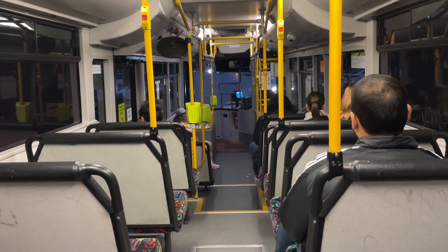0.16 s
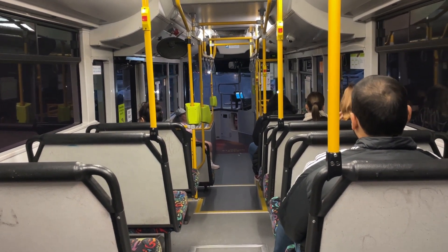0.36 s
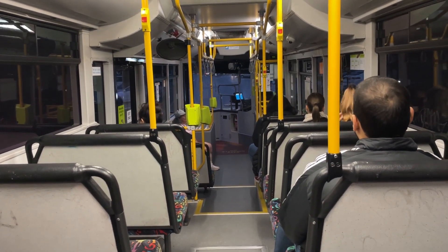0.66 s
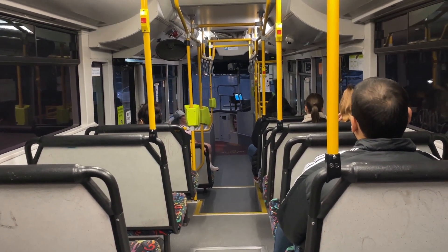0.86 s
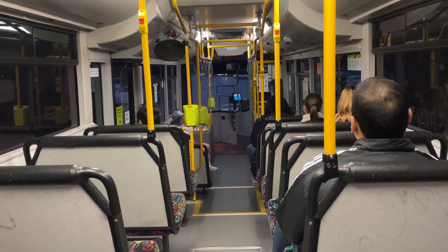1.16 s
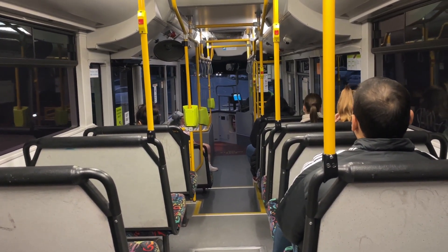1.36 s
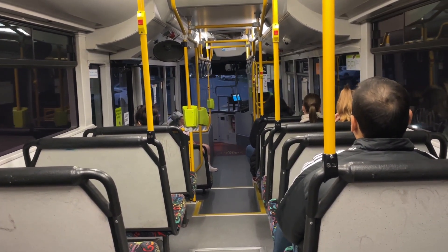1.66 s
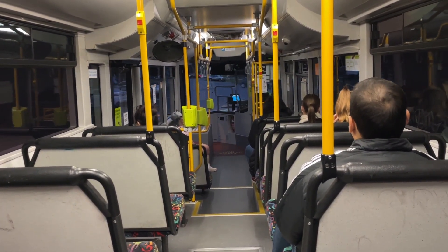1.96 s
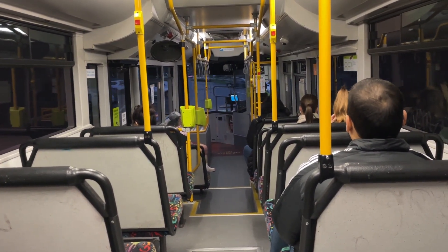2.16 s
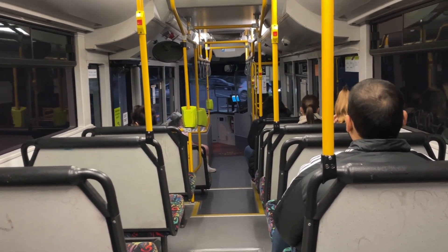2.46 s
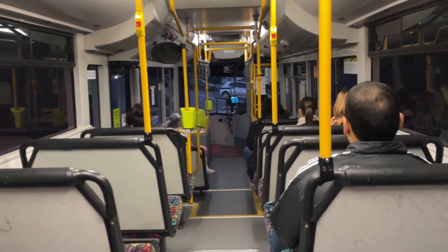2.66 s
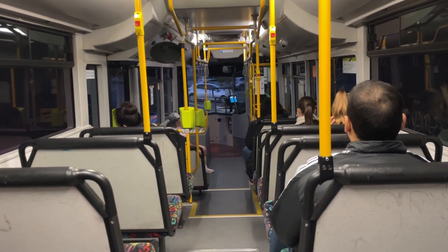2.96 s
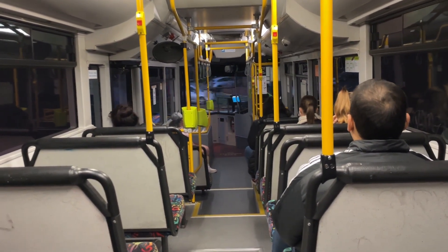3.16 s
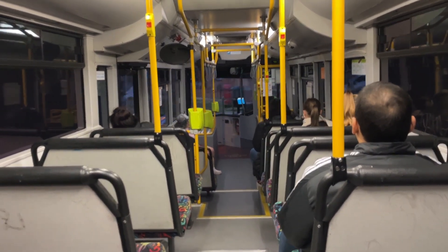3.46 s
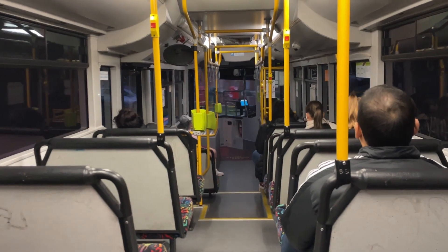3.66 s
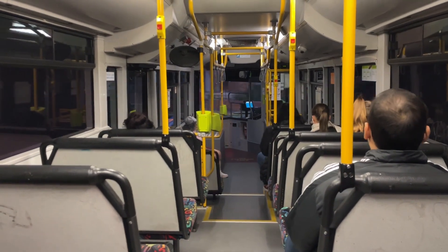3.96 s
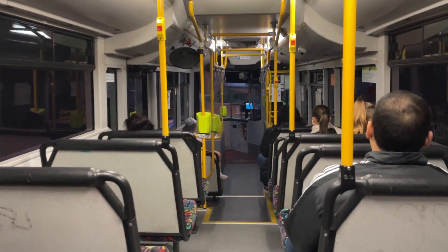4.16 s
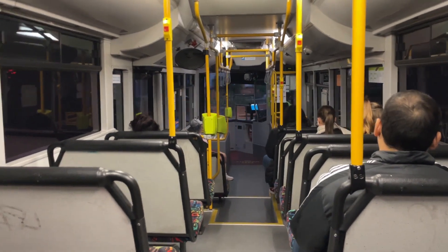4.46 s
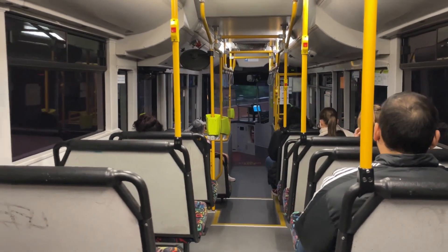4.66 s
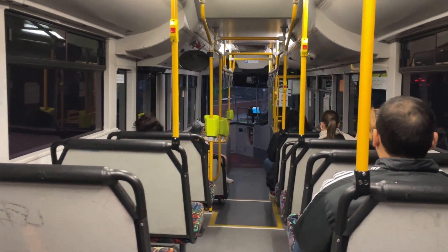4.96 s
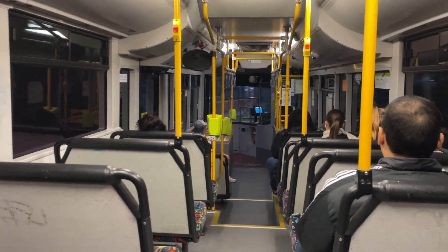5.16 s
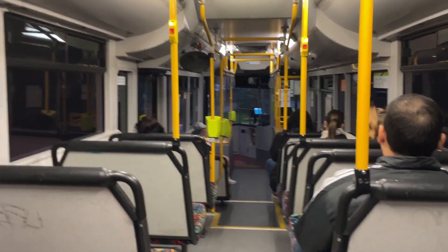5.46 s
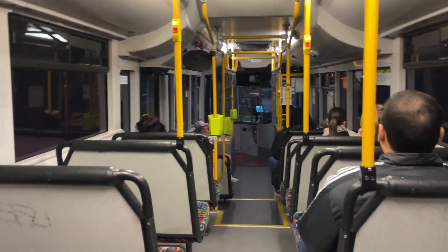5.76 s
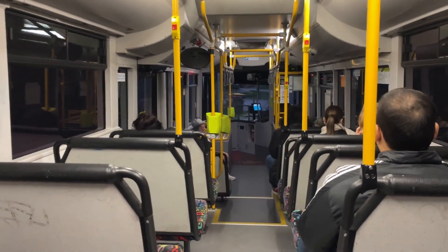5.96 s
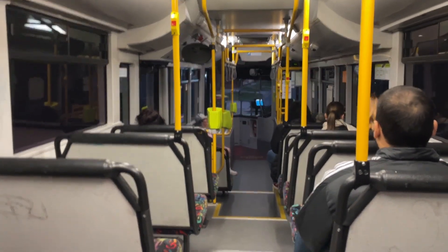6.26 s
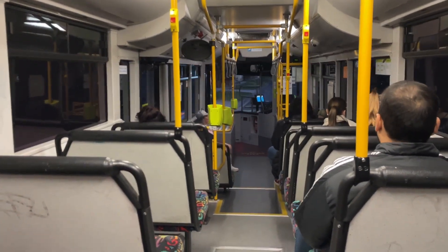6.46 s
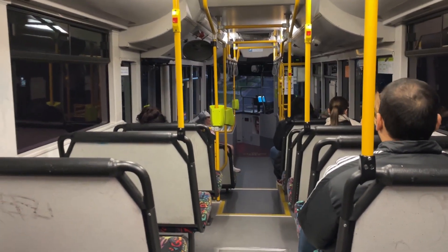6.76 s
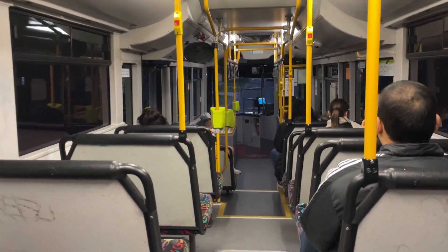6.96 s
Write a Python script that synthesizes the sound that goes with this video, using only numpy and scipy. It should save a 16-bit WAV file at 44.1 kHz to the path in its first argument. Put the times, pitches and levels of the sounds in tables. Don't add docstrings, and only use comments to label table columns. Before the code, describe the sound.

Inside an enclosed bus cabin, close stereo pickup. From 0 to 0.65 s a diesel idles with a very low, pulsing throb, around 30 beats a second, with tiny high air puffs and a barely audible brake squeal at the start. From 0.65 s it pulls away: the pitch doubles by about 1.7 s, then rises more slowly, nearly level around 3 s, as the low boom swells and shifts through cabin resonances. Gear whine, body rumble and soft combustion clatter thicken. Light jolts come near 1.05, 1.45, 2.2 and 2.6 s, with brief trim buzzes. From 4.5 s the revs climb again, peaking near 6.3 s; tyre and air hiss grows, and the hardest jolt lands at 5.2 s. At 5.85 s a loud, bright compressed-air release bursts and fades slowly. Loose trim rattles around 6.2 s, then engine pitch falls steeply and whine slackens until 7.1 s.

```python
import sys
import numpy as np
from scipy import signal
from scipy.fft import rfft, irfft
from scipy.io import wavfile
from scipy.ndimage import uniform_filter1d, minimum_filter1d, map_coordinates

SR = 44100
rng = np.random.default_rng(int(sys.argv[2]) if len(sys.argv) > 2 else 0)


def master(y):
    cut = np.clip(np.atleast_2d(y).T, -1, 1)
    pcm = np.round(cut * 32767)
    wavfile.write(sys.argv[1], SR, pcm.astype(np.int16))


def voltage_ratio(level):
    return 10 ** (np.asarray(level, float) / 20)


N = 313992
SECONDS = np.arange(N) / SR

# time_s, firing_hz
ENGINE_SPEED = [(0, 30.3), (.63, 30.4), (.875, 41.3), (1.05, 47.8), (1.25, 52.8), (1.625, 59.3),
                (2.2, 67.1), (2.8, 70.7), (3.3, 70.9), (4.5, 74.4), (4.65, 75.5), (5.125, 84), (5.75, 91.4),
                (6.05, 94.2), (6.29, 95), (6.4, 91.8), (6.75, 75), (7.12, 56)]
IDLE_HZ = 30
# mode_hz, width_hz, left_strength (signed), right_strength (signed)
CABIN_MODES = [(20.0, 2, 0.97, 0.731), (51, 26.6, -0.43, -0.37), (53.7, 23.1, 0.63, 0.59),
               (60.9, 2.4, -0.3, -0.36), (70.5, 11.6, 0.39, 0.18), (76.44, 6.14, -0.28, -0.41),
               (85.5, 23, 0.15, 0.26), (95.3, 3.7, -0.29, -0.19)]
# order (multiple of the firing rate), level_db
SHAFT_ORDERS = [(.77, -0.5), (1.53, -9), (2.001, -8.5), (3.07, -10)]
# mode_hz, width_hz, level_db
FRAME_MODES = [(48.1, 2.3, -14.5), (63.9, 8.9, -22), (91.6, 15, -15.5), (122.8, 14, -16),
               (176.3, 11, -15.5), (223.7, 16.9, -19.5), (253.2, 7.6, -16.5), (288.7, 10, -20)]
MESH_LEVELS = [-2.5, 2, -9]
MESH_ORDER = 4.4
# mode_hz, width_hz, level_db
WALL_MODES = [(150, 15, -36), (253, 14, -28), (270, 12, -38), (315, 22, -27.5), (345, 20, -27),
              (372, 40, -24.5), (445, 40, -28.5), (595, 22, -31.5), (645, 14, -32), (790, 40, -41),
              (950, 16, -31), (1020, 50, -24), (1095, 50, -27)]
PANEL_HZ, PANEL_WIDTH_HZ, PANEL_DB = 1045, 55, -40
COAST_DB = -.14
# multiple of the pump rate, level_db
PUMP_OVERTONES = [(3, -15), (5, -13), (7, -19), (8, -23), (9, -22), (10, -24), (14, -27), (15, -25)]
PUMP_ORDER = .768
# multiple of the crank rate (a third of the firing rate), level_db
CRANK_OVERTONES = [(4, -14), (8, -14), (9, -16), (10, -15), (12, -14), (15, -21), (16, -20), (18, -21),
                   (22, -25), (24, -25)]

# time_s, speed_kmh, roughness_db
ROAD_COURSE = [(0, 2.5, -21.5), (.5, -4.5, -23), (.9, 2, -18.5), (1.3, 0, -24), (1.8, 1, -24.5),
               (2.9, 10.5, -28), (3.3, 14, -34), (3.8, 16, -29.5), (4.55, 17, -26), (4.75, 20, -22),
               (5.55, 26.5, -21.5), (5.9, 31.5, -21), (6.7, 32.5, -21), (7.12, 30, -21.5)]
# idle_db, db_per_doubling of revs, db_per_kmh
RUMBLE_GROWTH = (-28.5, 3.25, 0.08)
CLATTER_GROWTH = (-45.5, 6.15, 0.052)
HISS_GROWTH = (-57, .1, 0.62)
# time_s, added_db (on the rumble)
ROAD_JOINTS = [
    (1.05, 1.5),
    (1.45, 2.5),
    (2.18, 1.5),
    (2.6, 1.5),
    (4.75, 0.5),
    (5.2, 3.5),
    (6.3, -0.5),
    (6.65, 2.5),
    (6.95, 2),
]
JOLT_S = 0.14
# frequency_hz, density_db per Hz
RUMBLE_SHARED = [(40, -27.5), (100, 0), (150, 0), (200, -7), (270, 0), (330, -2), (420, -3.5), (560, -8),
                 (700, -13.5), (850, -12.5), (1100, -17), (1300, -23.5), (2000, -41), (4000, -110)]
RUMBLE_DIFFERING = [(40, -37.5), (100, -10.5), (150, -9), (300, -13), (500, -10.5), (800, -11.5),
                    (1200, -30.5), (2000, -56), (4000, -110)]
CLATTER_SHARED = [(600, -23), (1000, -0.5), (1550, -5.5), (2000, -6.5), (2450, -7), (3000, -9.5),
                  (3500, -15.5), (5000, -18), (7300, -26.5), (7800, -55), (8700, -59), (9100, -43),
                  (11000, -44), (13000, -93)]
CLATTER_DIFFERING = [(600, -35), (1000, 0.5), (1500, -4), (2500, -10.5), (3600, -14), (4300, -22.5),
                     (5500, -21), (6200, -30.5), (8700, -25.5), (10200, -36.5), (11000, -100)]
HISS_SHARED = [(1500, -15), (2500, -0.5), (3400, -1.5), (6700, -4), (7500, -9), (7900, -25.5),
               (8350, -12.5), (8900, -9), (9400, -7), (12000, -7.5), (13700, -14), (14250, -17),
               (16000, -52)]
HISS_DIFFERING = [(1500, -29), (3000, 0.5), (4240, -5), (5450, -7.5), (6120, -8), (8730, -2), (10300, -10),
                  (10900, -18), (11500, -47), (12200, -22), (12700, -12.5), (15500, -8), (15750, -63)]
SHAKE_SHARED = [(15, -24), (30, -8), (42, 2.5), (60, -1.5), (95, -4.5), (130, -10), (200, -12.5),
                (400, -78)]
SHAKE_DIFFERING = [(15, -24), (40, -29), (70, -9.5), (110, -12), (200, -39), (400, -87)]
# mode_hz, width_hz, level_db (against the rumble or clatter)
TRIM_MODES = [(120, 20, -9), (250, 30, -11), (310, 30, -11), (465, 40, -14), (640, 40, -19), (780, 70, -19),
              (1030, 80, -22)]
GLASS_MODES = [(1900, 200, -16), (2300, 180, -11), (2550, 180, -11), (3500, 250, -20), (4500, 300, -22),
               (5300, 600, -19)]
# time_s, pitch_hz, level_db, length_s
SHORT_TONES = [(.17, 502, -36, .18), (.985, 1015, -33, .05), (1.48, 1010, -38, .08), (1.85, 435, -33, .25),
               (4.6, 985, -40, .12), (4.78, 460, -34, .15), (5.1, 800, -36, .12), (6.17, 618, -33, .15),
               (6.15, 316, -29, .4), (6.62, 665, -34, .22), (6.92, 590, -36, .2), (6.67, 1035, -33, .12),
               (6.22, 220, -28, .25), (5.5, 1125, -38, .12), (2.75, 310, -30, .15), (2.45, 262, -32, .5),
               (2.6, 462, -33, .15), (2.5, 2350, -47, .2), (6.1, 250, -30, .35)]

# start_s, level_db, rise_s, t60_s, lowest_hz
AIR_PUFFS = [
    (.002, -50, .005, .3, 4000),
    (.18, -50, .06, .5, 8000),
    (.43, -57, .005, .15, 8000),
    (.68, -57, .01, .3, 5000),
    (.935, -51, .008, .35, 5500),
    (1.69, -56, .01, .25, 8000),
    (2.4, -53, .01, .3, 8000),
    (5.845, -35.5, .015, 3.2, 1500),
]
# mode_hz, width_hz, level_db
NOZZLE_MODES = [(2250, 320, -1.5), (2650, 400, -4.5), (4300, 1500, -5)]
SQUEAL_HZ, SQUEAL_DB, SQUEAL_END_S = 6550, -64, .14

NULL_HZ, NULL_STEP_HZ = 8100, 3400
CEILING = .9


def boom(turns, firing_hz):
    waves = np.zeros((2, N), complex)
    for mode_hz, width, left, right in CABIN_MODES:
        response = 1 / (1 + 2j * (firing_hz - mode_hz) / width)
        waves += np.outer([left, right], response)
    spin = np.exp(1j * (2 * np.pi * turns + 0.043 * drift(27)))
    swell = voltage_ratio(.5 * np.array([drift(8.6), drift(13)]))
    return np.sqrt(2) * swell * (waves * spin).imag


def shafts(turns, firing_hz):
    return sum(tone(order * turns, db + passed_db(FRAME_MODES, order * firing_hz), 0.37, 1.96)
               for order, db in SHAFT_ORDERS)


def gears(turns, firing_hz):
    whine = np.zeros((2, N))
    for multiple, db in enumerate(MESH_LEVELS, 1):
        order = multiple * MESH_ORDER
        whine += tone(order * turns, db + passed_db(WALL_MODES, order * firing_hz), .5, 3.0)
    for multiple in (4, 5):
        order = multiple * MESH_ORDER
        near = 1 / (1 + ((order * firing_hz - PANEL_HZ) / PANEL_WIDTH_HZ) ** 2)
        whine += near * tone(order * turns, PANEL_DB, 0.86, 3.5)
    return whine


def overtones(turns):
    orders = [(k * PUMP_ORDER, db) for k, db in PUMP_OVERTONES]
    orders += [(k / 3, db) for k, db in CRANK_OVERTONES]
    return sum(tone(order * turns, db + 4 * np.minimum(drift(2.5), .7), .3 + order / 10, 2)
               for order, db in orders)


def rumble(turns, firing_hz, speed_kmh, load):
    level_db = grown_db(RUMBLE_GROWTH, firing_hz, speed_kmh)
    for time, added_db in ROAD_JOINTS:
        level_db = level_db + added_db * np.exp(-((SECONDS - time) / JOLT_S) ** 2)
    body = voltage_ratio(-3.5) * port_noise(RUMBLE_SHARED, RUMBLE_DIFFERING, 3.2, 0.71, 6, 0)
    return voltage_ratio(level_db) * (body + ringing(TRIM_MODES, 2.3) + load * overtones(turns))


def clatter(turns, firing_hz, speed_kmh):
    throb = 1 + 0.042 * np.cos(2 * np.pi * turns)
    combustion = throb * port_noise(CLATTER_SHARED, CLATTER_DIFFERING, .3, 0.68, 9.9, .4)
    return voltage_ratio(grown_db(CLATTER_GROWTH, firing_hz, speed_kmh)) * (combustion + ringing(GLASS_MODES, 0.76))


def hiss(firing_hz, speed_kmh):
    return voltage_ratio(grown_db(HISS_GROWTH, firing_hz, speed_kmh)) * hiss_noise(0.44, 10)


def shake(roughness_db):
    return voltage_ratio(roughness_db) * port_noise(SHAKE_SHARED, SHAKE_DIFFERING, 1.3, 0.48, 4.1, 0)


def buzzes():
    out = np.zeros((2, N))
    for time, pitch, db, length in SHORT_TONES:
        swell = np.exp(-((SECONDS - time) / length * 2) ** 2)
        out += swell * tone(pitch * SECONDS, db, 0.4, 1.5)
    return out


def air():
    jet = hiss_noise(0.93, 17) + ringing(NOZZLE_MODES, 2.5)
    out = np.zeros((2, N))
    for start, db, rise, t60, lowest_hz in AIR_PUFFS:
        since = np.maximum(SECONDS - start, 0)
        flow = voltage_ratio(db - 60 * since / t60) * np.minimum(since / rise, 1)
        highpass = signal.butter(4, lowest_hz, "high", fs=SR, output="sos")
        out += flow * signal.sosfilt(highpass, jet)
    fade = np.clip((SQUEAL_END_S - SECONDS) / .03, 0, 1)
    return out + fade * tone(SQUEAL_HZ * SECONDS, SQUEAL_DB, .8, 1)


def tone(turns, level_db, waver, flutter_db):
    common = rng.uniform(0, 2 * np.pi) + waver * drift(9)
    ports = []
    for _ in range(2):
        swell = voltage_ratio(flutter_db * drift(7))
        ports.append(swell * np.sin(2 * np.pi * turns + common + .5 * waver * drift(3.05)))
    return np.sqrt(2) * voltage_ratio(level_db) * np.array(ports)


def passed_db(modes, hz):
    power = sum(voltage_ratio(db) ** 2 / (1 + (2 * (hz - mode_hz) / width) ** 2) ** 2 for mode_hz, width, db in modes)
    return 10 * np.log10(power)


def ringing(modes, flutter_db):
    out = np.zeros((2, N))
    for hz, width, db in modes:
        radius = np.exp(-np.pi * width / SR)
        stage = [1, 0, -1, 1, -2 * radius * np.cos(2 * np.pi * hz / SR), radius ** 2]
        mid, side = signal.sosfilt([stage, stage], rng.standard_normal((2, N)))
        pair = np.array([mid + 0.72 * side, mid - 0.5 * side])
        out += voltage_ratio(db + flutter_db * drift(4)) * rms_one(pair)
    return out


def port_noise(shared, differing, left_db, flicker_db, flicker_hz, aimed):
    one, other = rfft(rng.standard_normal((2, N)))
    hz = np.fft.rfftfreq(N, 1 / SR)
    lead = 1j * np.sign(np.sin(np.pi * (hz - NULL_HZ) / NULL_STEP_HZ))
    mid = coloured(one, shared)
    side = coloured(aimed * lead * one + np.sqrt(1 - aimed ** 2) * other, differing)
    gain = voltage_ratio(flicker_db * drift(flicker_hz)) / np.sqrt(np.mean(mid ** 2))
    balance = voltage_ratio(np.array([[left_db], [-left_db]]) / 2)
    return np.array([mid + side, mid - side]) * balance * gain


def hiss_noise(flicker_db, flicker_hz):
    return port_noise(HISS_SHARED, HISS_DIFFERING, .1, flicker_db, flicker_hz, .8)


def coloured(white, spectrum):
    log_hz = np.log(np.fft.rfftfreq(N, 1 / SR) + 1)
    hz, db = np.transpose(spectrum)
    return irfft(white * voltage_ratio(np.interp(log_hz, np.log(hz), db)), N)


def grown_db(growth, firing_hz, speed_kmh):
    idle_db, per_doubling, per_kmh = growth
    return idle_db + per_doubling * np.log2(firing_hz / IDLE_HZ) + per_kmh * speed_kmh


def drift(rate):
    coarse = np.arange(0, N + 128, 128) / SR
    course = map_coordinates(rng.standard_normal(400), [1 + coarse * rate], order=2)
    return np.interp(SECONDS, coarse, course)


def in_time(rows):
    times, *columns = np.transpose(rows)
    return [np.interp(SECONDS, times, column) for column in columns]


def rms_one(x):
    return x / np.sqrt(np.mean(x ** 2) + 1e-20)


def scene():
    firing_hz = uniform_filter1d(in_time(ENGINE_SPEED)[0], size=2001)
    turns = np.cumsum(firing_hz) / SR
    slowing = uniform_filter1d(np.maximum(-np.gradient(firing_hz) * SR, 0), size=6000)
    load = voltage_ratio(COAST_DB * slowing)
    speed_kmh, roughness_db = in_time(ROAD_COURSE)
    engine = boom(turns, firing_hz) + shafts(turns, firing_hz) + load * gears(turns, firing_hz)
    body = rumble(turns, firing_hz, speed_kmh, load) + clatter(turns, firing_hz, speed_kmh)
    road = hiss(firing_hz, speed_kmh) + shake(roughness_db)
    return engine + body + road + buzzes() + air()


def top_cut(x):
    return signal.sosfilt(signal.butter(12, 15630, fs=SR, output="sos"), x)


def record(dry):
    peak = -minimum_filter1d(-np.abs(dry).max(axis=0), size=1201)
    gain = uniform_filter1d(np.minimum(1, CEILING / (peak + 1e-9)), size=1201)
    return top_cut(gain * dry)


dry = scene()
out = record(dry)
master(out)
```